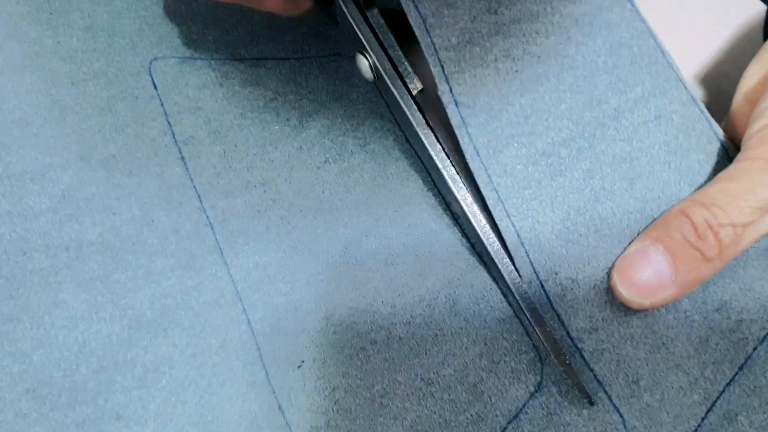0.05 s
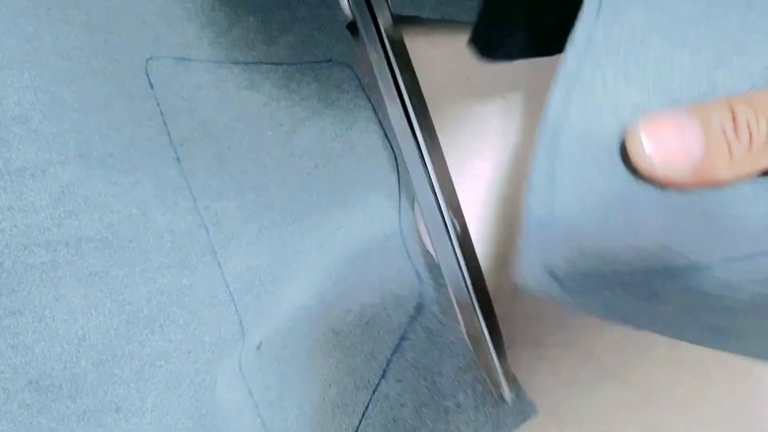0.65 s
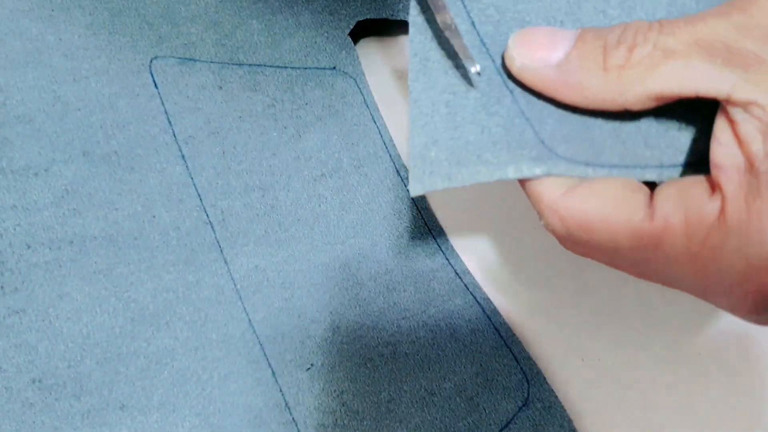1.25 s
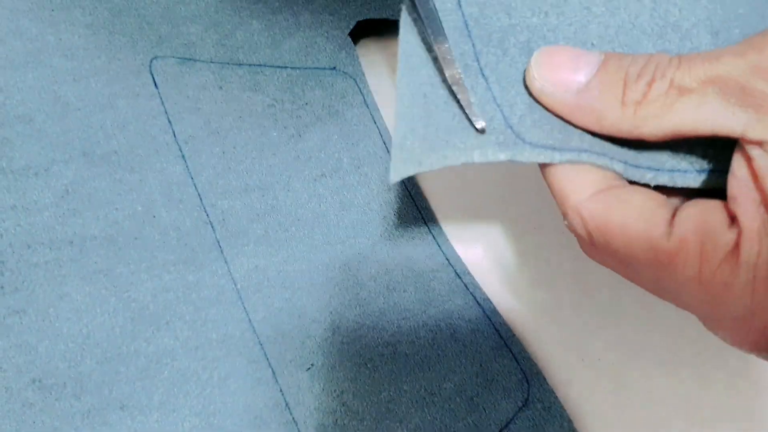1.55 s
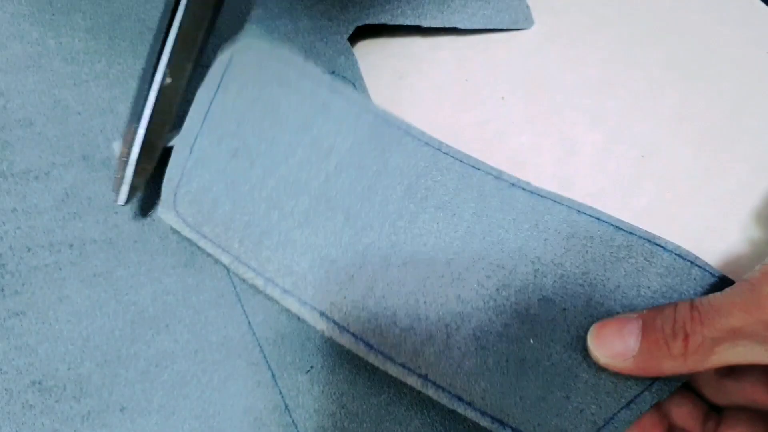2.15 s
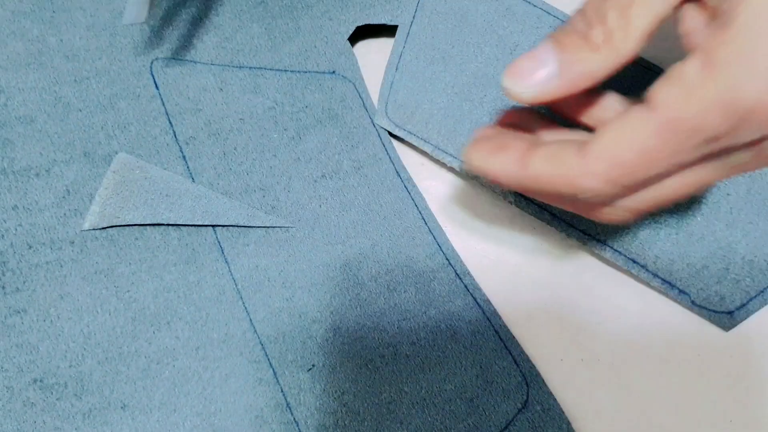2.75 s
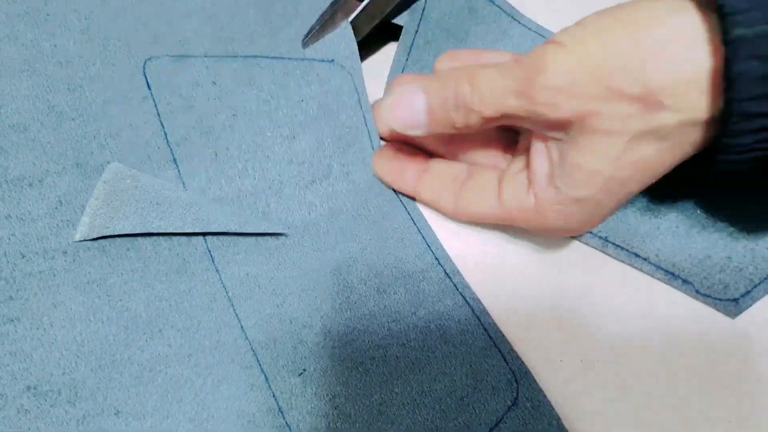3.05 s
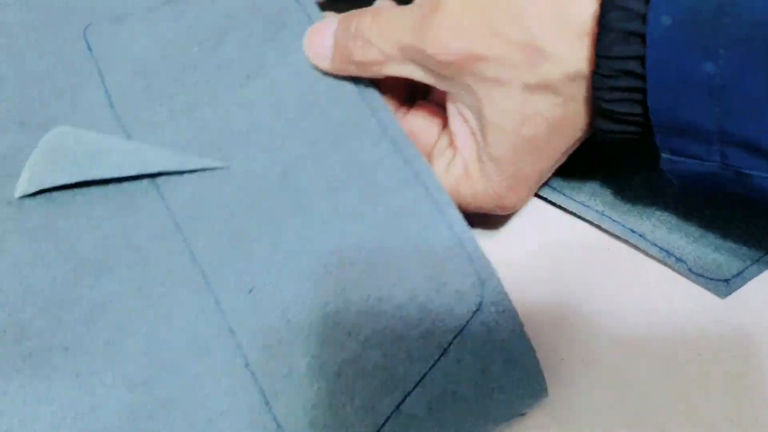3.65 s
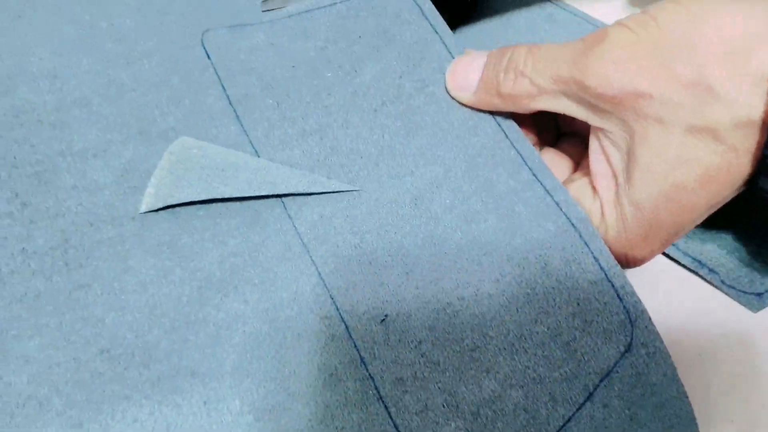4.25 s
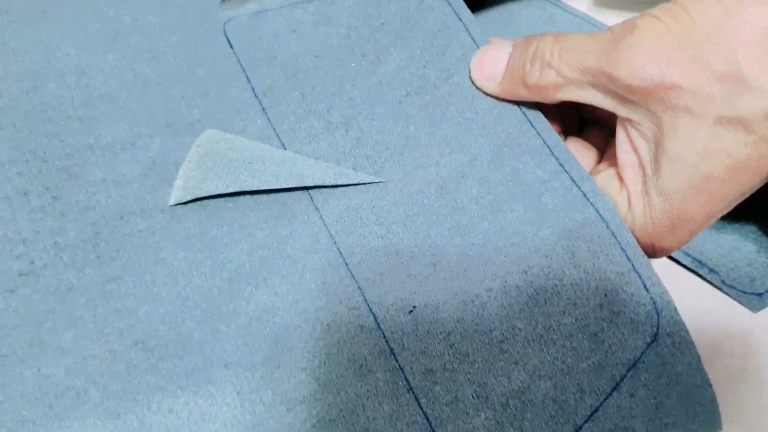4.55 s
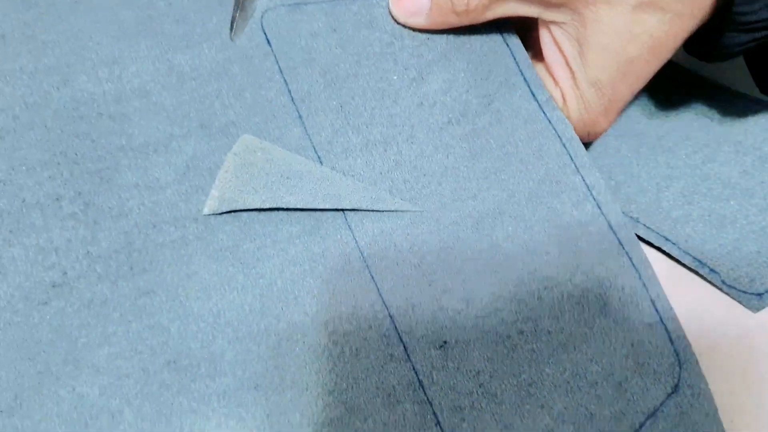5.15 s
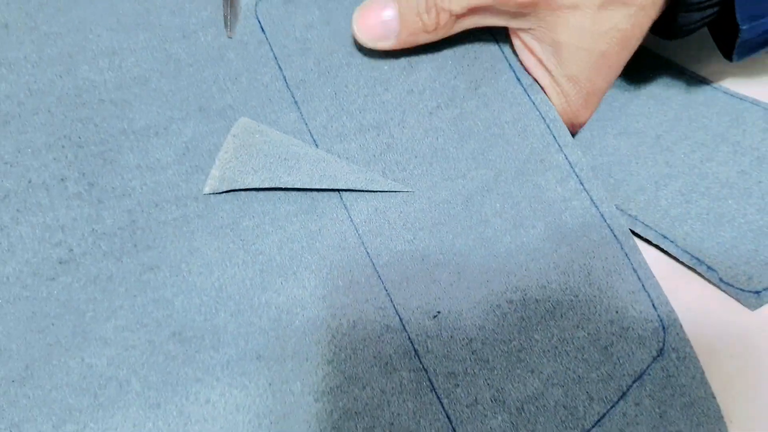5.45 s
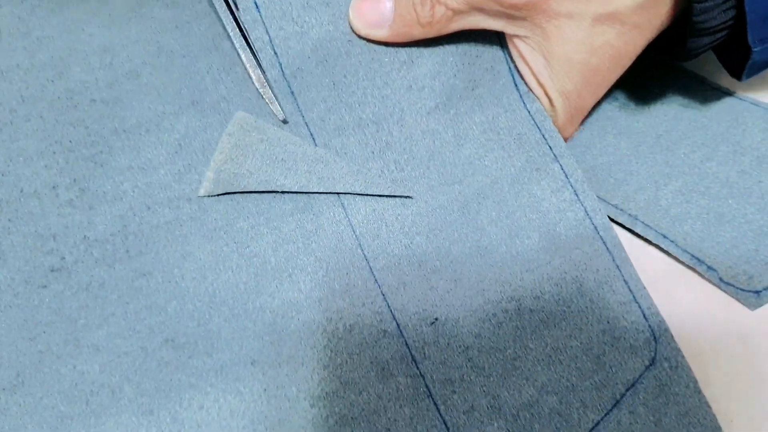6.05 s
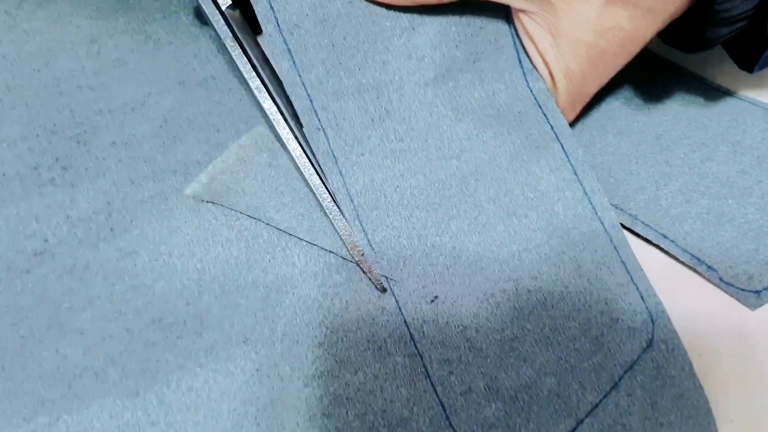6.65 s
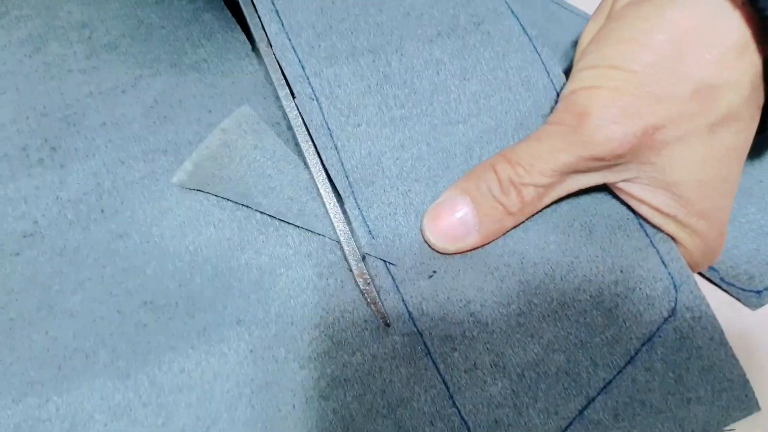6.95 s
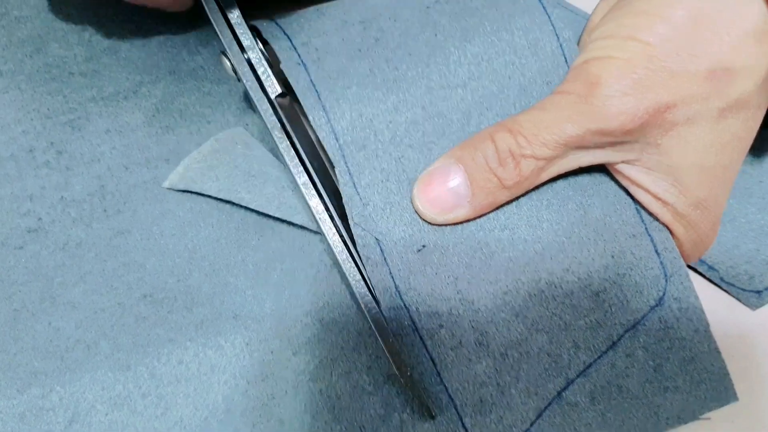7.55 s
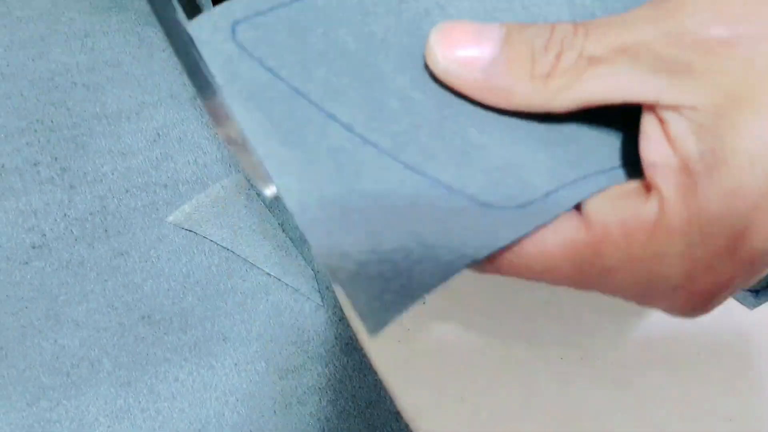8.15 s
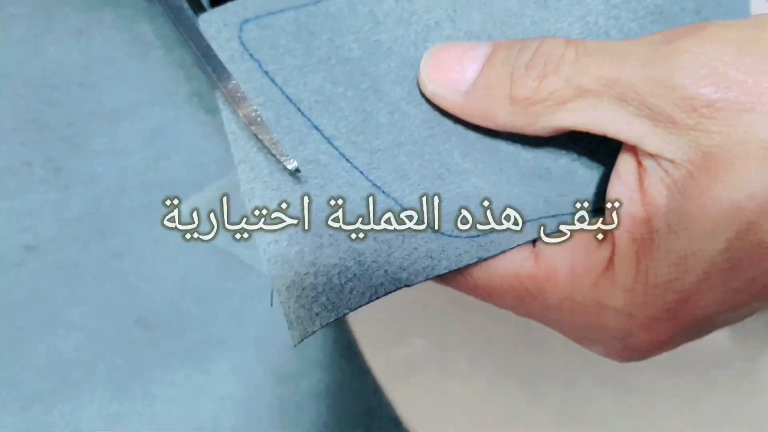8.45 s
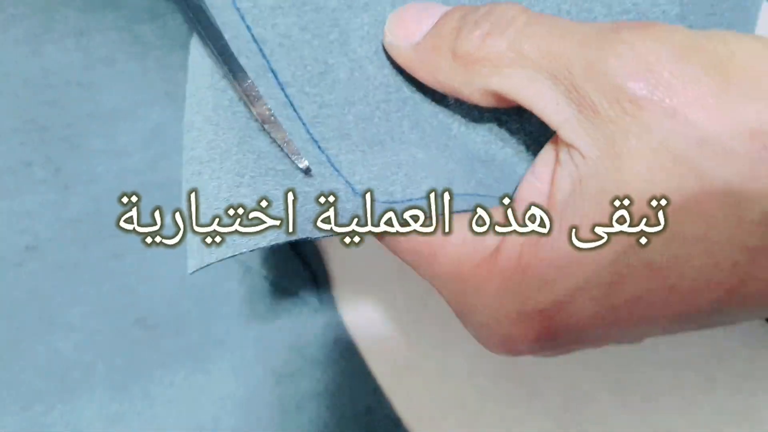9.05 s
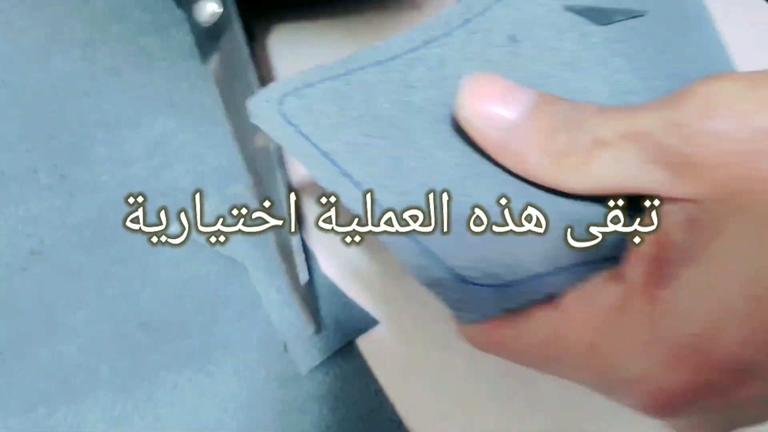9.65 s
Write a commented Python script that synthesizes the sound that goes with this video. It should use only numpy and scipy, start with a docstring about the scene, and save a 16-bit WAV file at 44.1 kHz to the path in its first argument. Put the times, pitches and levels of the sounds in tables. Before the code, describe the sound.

Heavy shears cut suede on a work table, close up in a dry room with a faint low hum. Four short, crunchy snips with a thin steel hiss fill the first 0.6 seconds, followed by two light metal taps. More small snips come from 1.3 to 2.2 seconds, ending with sharp ticks. From 2.5 to 3.9 seconds hands drag and turn the leather, with swishes, a tiny squeak, taps and soft table thuds. Quick, even cuts run from 4 to 4.9 seconds, about seven a second. Rubbing and a dull thud follow near 5.2. Cutting resumes from 5.4 to 8 seconds, growing crunchiest at the end, as a faint low drone comes up. Light ticks and a few trimming snips follow until 9.6, then a tap. At 9.9 seconds something is set down hard with a brief clatter, the loudest sound.

```python
"""Shears cutting suede

Heavy tailor's shears cut a shape out of suede on a work table, heard close up. Each closing stroke
crunches through fibres while the blades hiss and the sheet rings; between strokes the shears slide on.
Hands drag and turn the leather, the table thuds softly and a hum lies behind.
At the end something is set down hard on the table."""
import sys
import numpy as np
from scipy import signal
from scipy.fft import rfft, irfft, next_fast_len
from scipy.io import wavfile

SR = 44100
rng = np.random.default_rng(int(sys.argv[2]) if len(sys.argv) > 2 else 0)


def output_pcm(signal):
    """Save a mono or channel-first signal as 16-bit PCM at the path in sys.argv[1].

    Samples are clipped to [-1, 1] before scaling.
    """
    pcm = np.clip(np.atleast_2d(signal).T, -1, 1) * 32767
    wavfile.write(sys.argv[1], SR, np.round(pcm).astype(np.int16))


N = 437031
T = np.arange(N) / SR

# closing strokes: start_s, length_s, sheet_db, fibre_db, blade_db, ring_hz, first_snap_db, last_snap_db
STROKES = [(0.005, .03, -76.5, -72.5, -85, 536, 24.5, 25), (0.111, 0.047, -58.5, -56.5, -56.5, 800, 14, -2),
           (0.321, 0.061, -70.5, -59.5, -57, 1120, 6, -16),
           (0.522, 0.091, -68, -55.5, -57.5, 930, 14.5, 13), (1.32, 0.053, -62.5, -64.5, -61, 850, 7, 8),
           (1.587, 0.04, -68.5, -61, -56, 940, 12, 10), (1.803, 0.0076, -76, -61.5, -57.5, 810, 9.5, -8),
           (1.862, 0.015, -89, -62.5, -60, 820, 11, 4), (1.915, 0.011, -75.5, -65, -59.5, 940, -3, 9.5),
           (2.168, 0.031, -78, -66, -60, 967, -12, 11), (3.969, 0.035, -63.5, -62.5, -53.5, 960, 2, 4),
           (4.133, 0.031, -60.5, -64, -53, 883, 8.5, 6), (4.278, .022, -58, -65, -49, 964, 15.5, -0.5),
           (4.427, 0.029, -63, -65, -57, 990, 16, 14.5), (4.571, .024, -60.5, -60, -50.5, 897, 10.5, -23),
           (4.721, 0.0051, -48.5, -50, -46, 850, -12, -17), (4.87, 0.028, -65, -59, -54, 1190, -3, -14),
           (5.394, 0.018, -64.5, -65.5, -56, 820, 7.5, -17), (5.721, 0.036, -67, -69.5, -59, 800, 12, 10),
           (5.993, 0.023, -59, -56, -64, 1040, -21, -8), (6.074, 0.034, -57, -61.5, -55.5, 714, -12, -18),
           (6.227, 0.027, -55, -59.5, -53.5, 824, 2, -14), (6.379, .025, -56.5, -61, -55, 574, 11, -10),
           (6.531, 0.024, -56, -58, -52, 1053, 11, -11), (6.701, 0.023, -60, -63.5, -53.5, 784, 11, -10),
           (6.91, .03, -57.5, -60, -67, 830, -2, -18), (7.202, 0.061, -63.5, -64, -59.5, 1060, -20, 22),
           (7.462, 0.028, -54, -56, -53, 820, 7.5, 0), (7.635, 0.035, -57.5, -56, -51, 760, 12, 2),
           (7.798, 0.02, -55, -47, -48, 1120, 10, -2), (7.957, 0.024, -58.5, -47.5, -54.5, 946, 6.5, -0.5),
           (8.827, 0.1, -85, -70.5, -64.5, 700, -13, -3), (8.925, 0.04, -69.5, -65, -54, 670, -16, 2),
           (9.145, 0.027, -56.5, -59, -51.5, 940, -2, 2), (9.371, 0.054, -70, -69.5, -56, 940, 14, 8),
           (9.56, 0.018, -60.5, -58, -51.5, 985, 5, 0.5)]
# runs of strokes with one grip: start_s, whistle_over_hiss_db, opening_share_of_pause, rub_db, hiss_db
GRIPS = [(0, -0.5, 0.5, -67, -59.5), (1.2, -7, 0.69, -64.5, -67.5), (3.9, 6.5, 0.63, -54, -69),
         (5.3, -10, 0.58, -66, -66.5), (6.3, -2, 0.65, -56, -62.5), (6.8, -5, .52, -54.5, -59),
         (7.55, -1, 0.66, -56, -59.5), (8.5, -10, 0.73, -58.5, -68)]
# blade ring, damped by the leather: pitch_hz, width_hz, level_db
BLADE_MODES = [(6770, 75, -11.5), (7640, 870, -11.5), (8970, 310, -9.5), (11460, 370, 4.5),
               (12000, 500, -1)]
# spectra of the cut: freq_hz, level_db
SHEET_SPECTRUM = [(150, -30), (350, -7.5), (550, -2), (750, -0.5), (950, 1), (1250, -9), (2000, -5),
                  (5000, -53.5)]
FIBRE_SPECTRUM = [(600, -24.5), (1200, -3), (1600, -2), (2300, -0.5), (3200, -0.5), (4200, -1.5),
                  (5400, -7), (7500, -12.5), (15000, -33)]
BLADE_HISS_SPECTRUM = [(3500, -21), (5000, -5), (7000, -1.5), (8200, 4), (9700, 0.5), (11500, -7),
                       (15500, -16.5)]
EDGE_WHISTLE_SPECTRUM = [(7000, -19), (10000, 0.5), (11600, 2.5), (12800, 5.5), (14000, -6), (15500, -16)]


def cutting(lead_s=0.0053, ring_share=0.23, steel_share=0.063, push_db=-10):
    """Fibres part; the held sheet rings, the edges hiss and the lower blade pushes on the table."""
    force = stroke_forces(lead_s)
    push = from_db(push_db) * resonate((force[0] + force[1]) * noise(), hz=175, width_hz=59)
    force *= grains(per_s=1000, spread_db=2.5)
    force += snap_forces()
    sheet, fibre, blade = (part_force * noise() for part_force in force)
    ring, whistle_share = np.zeros((2, N)), np.zeros(N)
    starts = [max(round((start_s - lead_s) * SR), 0) for start_s, *_ in STROKES]
    for (start_s, *_, ring_hz, _, _), start, end in zip(STROKES, starts, starts[1:] + [N]):
        whistle_db, *_ = grip_at(start_s)
        whistle_share[start:] = 1 / (1 + from_db(-whistle_db) ** 2)
        # the free length of leather, and so pitch and colour, differ by stroke
        span = slice(start, min(end, start + SR // 4))
        ring[:, span] = resonate(sheet[:, span], ring_hz, width_hz=70)
        for layer in (fibre, blade):
            layer[:, span] = patchy(layer[:, span], depth_db=1.5)
    leather = np.sqrt(1 - ring_share) * colour(sheet, SHEET_SPECTRUM) + np.sqrt(ring_share) * ring
    crunch = colour(fibre, FIBRE_SPECTRUM)
    hiss = colour(blade * np.sqrt(1 - whistle_share), BLADE_HISS_SPECTRUM)
    whistle = from_db(0.5) * colour(blade * np.sqrt(whistle_share), EDGE_WHISTLE_SPECTRUM)
    steel = sum(from_db(db) * resonate(blade, hz, width_hz) for hz, width_hz, db in BLADE_MODES)
    steel *= np.sqrt(steel_share / len(BLADE_MODES))
    edges = hiss + whistle
    return from_db(-1.1) * leather + from_db(-2.3) * crunch + from_db(-1.5) * edges + steel + push


def stroke_forces(lead_s, brush_db=-11, half_rise_s=0.0036, release_s=0.0086, sag_db=5.0):
    """Blades brush the nap, bite and lose leverage towards the tips: force on sheet, fibres, blades."""
    force, early_s = np.zeros((3, N)), 0.05
    t = np.arange(SR // 4) / SR - early_s
    brush = from_db(brush_db) * np.exp(np.minimum(t, 0) / lead_s)
    bite = np.clip((t + half_rise_s) / (2 * half_rise_s), 0, 1) ** 2
    for start_s, length_s, *levels_db, _, _, _ in STROKES:
        release = np.exp(-np.maximum(t - length_s, 0) / release_s)
        leverage = from_db(sag_db * (0.5 - np.clip(t / length_s, 0, 1)))
        stroke = np.maximum(brush, bite) * release * leverage
        add(force, start_s - early_s, from_db(levels_db)[:, None] * stroke)
    return force


def grip_at(time_s):
    """The grip in use: its row without start_s."""
    return [grip[1:] for grip in GRIPS if grip[0] <= time_s][-1]


FIRST_SNAP_S, LAST_SNAP_SHARE = 0.0073, 0.794


def snap_forces(rise_s=0.002, first_parts_db=(-2.5, -5, -20), last_parts_db=(-1, -0.5, -3)):
    """Tough bundles give way early and late in each stroke: force on sheet, fibres, blades."""
    force, t = np.zeros((3, N)), np.arange(SR // 20) / SR
    burst = t / rise_s * np.exp(1 - t / rise_s)
    for start_s, length_s, *levels_db, _, first_db, last_db in STROKES:
        first = (FIRST_SNAP_S, first_db, first_parts_db)
        last = (LAST_SNAP_SHARE * length_s, last_db, last_parts_db)
        for after_s, snap_db, parts_db in (first, last):
            strength = from_db(np.add(levels_db, parts_db) + snap_db)
            add(force, start_s + after_s - rise_s, strength[:, None] * burst)
    return force


def snap_rings(knock_db=-1, sag_per_s=0.86, ping_db=-12):
    """Each snap plucks the sheet, whose pitch sags as it slackens, and pings the steel."""
    out, t = np.zeros((2, N)), np.arange(SR // 10) / SR
    for start_s, length_s, sheet_db, _, blade_db, ring_hz, first_db, last_db in STROKES:
        knock = mode(t, ring_hz * (1 - sag_per_s * t), t60_s=0.039)
        for after_s, snap_db in ((FIRST_SNAP_S, first_db), (LAST_SNAP_SHARE * length_s, last_db)):
            add(out[0], start_s + after_s, from_db(sheet_db + snap_db + knock_db) * knock)
            # each ping rings at slightly different, random pitches
            ping = sum(from_db(db) * mode(t, hz + width_hz * (rng.random((2, 1)) - 0.5), t60_s=0.04)
                       for hz, width_hz, db in BLADE_MODES)
            add(out, start_s + after_s, from_db(blade_db + ping_db) * ping)
    return out


# suede sweeping over sheet or blade, and the rough edge of the squeak near 4.9 s: start_s, length_s, level_db,
# centre_hz, width_hz
SWISHES = [(1.494, 0.021, -63, 4250, 500), (1.73, 0.011, -60, 2260, 600), (1.88, 0.1, -72, 4400, 500),
           (1.981, 0.057, -56.5, 3050, 1200), (2.541, 0.026, -62.5, 1450, 500),
           (2.619, 0.019, -46, 1720, 400), (2.623, 0.023, -52, 2780, 3650), (2.625, .025, -57, 720, 87),
           (3.013, 0.036, -55, 9500, 5000), (3.766, 0.052, -62, 1160, 350), (4.859, .04, -59.5, 1130, 130),
           (4.966, 0.079, -61, 730, 160), (5.17, 0.022, -47, 7200, 910), (5.163, 0.032, -51, 9900, 4000),
           (7.164, 0.082, -68, 1080, 400)]
# opening blades rasping on each other: centre_hz, width_hz, level_db
RASP_MODES = [(2230, 1300, -17), (4180, 710, -14)]
# spectra of sliding suede: freq_hz, level_db
RUB_SPECTRUM = [(100, 0.5), (200, 5.5), (400, 3), (700, 2.5), (1200, -1), (1700, 0.5), (2800, -5.5),
                (4500, -14.5), (9000, -34.5)]
NAP_HISS_SPECTRUM = [(1500, -10.5), (3000, 1.5), (4200, 1.5), (7500, -1), (10000, -2), (13000, -3),
                     (15500, -19)]


def rubbing(slide_rub_db=-6, slide_boom_db=-10.5, drag_boom_db=-5):
    """Suede slides over table and opening blades with a grainy rub; skids make the table boom."""
    drag, drag_hiss = handling()
    slide, slide_hiss = openings()
    nap = grains(per_s=350, spread_db=4.0)
    rub = colour((drag + from_db(slide_rub_db) * slide) * nap * noise(), RUB_SPECTRUM)
    fine_nap = grains(per_s=1900, spread_db=2.5)
    hiss = colour((drag_hiss + slide_hiss) * fine_nap * noise(), NAP_HISS_SPECTRUM)
    rasp = sum(from_db(db) * resonate(slide * nap * noise(), hz, width_hz)
               for hz, width_hz, db in RASP_MODES)
    skid = from_db(slide_boom_db) * slide + from_db(drag_boom_db) * drag
    boom = resonate(skid * noise(), hz=160, width_hz=60)
    swishes = np.zeros((2, N))
    for start_s, length_s, db, hz, width_hz in SWISHES:
        speed = gesture(start_s, length_s, attack_s=0.014, release_s=0.025)
        swishes += resonate(from_db(db) * speed * noise(), hz, width_hz)
    return rub + hiss + rasp + boom + swishes


def openings(min_pause_s=0.08, max_pause_s=0.255):
    """The shears open and slide on in short pauses between strokes: rub and hiss envelopes."""
    envelopes = np.zeros((2, N))
    for (start_s, length_s, *_), (next_s, *_) in zip(STROKES, STROKES[1:]):
        pause_s = next_s - start_s - length_s
        if min_pause_s < pause_s < max_pause_s:
            _, share, *levels_db = grip_at(next_s)
            speed = swell(start_s + length_s + share * pause_s, half_width_s=0.016)
            envelopes += from_db(levels_db)[:, None] * speed
    return envelopes


# long moves of the suede, one curve each: time_s, rub_db, hiss_db
DRAGS = [
    [(1.88, -84, -68), (1.914, -67, -64), (1.924, -86, -67), (1.936, -69.5, -63.5), (2.024, -62.5, -61.5),
     (2.038, -72, -69), (2.056, -67, -70), (2.1, -95, -88), (2.15, -70, -68.5)],
    [(2.22, -73, -72), (2.254, -83, -82), (2.316, -73, -71.5), (2.402, -84.5, -89), (2.558, -71.5, -62.5),
     (2.61, -69, -78), (2.636, -62.5, -59.5), (2.736, -64.5, -71.5), (2.8, -121, -85)],
    [(2.88, -97, -90), (2.894, -72, -83), (2.948, -69.5, -63.5), (3.016, -60.5, -57), (3.27, -66, -72.5),
     (3.342, -62, -65.5), (3.418, -71.5, -77.5), (3.818, -65, -71), (3.92, -77.5, -91)],
]
# brief hand shifts: start_s, length_s, rub_db, hiss_db
HAND_SHIFTS = [(0.638, 0.28, -67, -68.5), (0.76, 0.01, -60, -70), (1.129, 0.042, -78, -87),
               (1.282, .025, -73, -69), (1.364, 0.094, -72.5, -72), (1.682, 0.019, -77, -70.5),
               (3.301, 0.066, -70, -66), (3.585, 0.035, -62, -67), (4.943, 0.093, -59, -65),
               (5.194, 0.08, -61, -59.5), (5.44, 0.07, -72.5, -70.5), (5.543, 0.047, -62.5, -63),
               (5.811, 0.032, -64.5, -62), (6.64, 0.037, -57, -62), (6.872, 0.03, -57, -72),
               (6.95, 0.051, -76, -80.5), (7.05, 0.011, -64, -88), (7.144, 0.032, -86, -72.5),
               (7.986, 0.12, -66.5, -68.5), (8.13, 0.016, -59.5, -63.5), (8.994, 0.053, -71.5, -75),
               (9.211, 0.049, -67.5, -75), (9.607, 0.02, -58, -68), (9.658, 0.29, -64.5, -68.5)]


def handling(rub_gain_db=2, hiss_gain_db=2.5):
    """Hands drag and shift the suede, catching now and then: rub and hiss envelopes."""
    rub = from_db(rub_gain_db) * sum(level(move, column=1) for move in DRAGS)
    hiss = from_db(hiss_gain_db) * sum(level(move, column=2) for move in DRAGS)
    envelopes = np.array([rub, hiss])
    for start_s, length_s, *levels_db in HAND_SHIFTS:
        speed = gesture(start_s, length_s, attack_s=0.021, release_s=0.03)
        envelopes += from_db(levels_db)[:, None] * speed
    return envelopes * grains(per_s=60, spread_db=2.0)


# light taps of the shears: start_s, level_db, ring_hz, brightness_db
TAPS = [(0.766, -31.5, 2030, -2.5), (0.891, -40, 2230, 5), (1.308, -46.5, 2970, 17),
        (1.961, -34.5, 1750, -11), (2.187, -28, 6650, 0), (2.562, -37, 1520, -14), (2.895, -47, 1600, -10),
        (2.981, -31, 1630, -12), (3.334, -31, 870, -19), (8.055, -46.5, 2210, 10.5), (8.315, -56, 7000, -2),
        (8.505, -59, 7000, 3), (8.675, -49.5, 2160, 7), (9.622, -27, 590, -12)]


def taps(crack_t60_s=0.0062, rattle_db=-17, rattle_t60_s=0.043):
    """Steel touches steel or table: a crack, a very short ring and a faint rattle."""
    out, t = np.zeros((2, N)), np.arange(SR // 10) / SR
    for start_s, db, hz, brightness_db in TAPS:
        crack, rattle = rng.standard_normal((2, 2, len(t)))
        tap = from_db(brightness_db - 8.5 - 60 * t / crack_t60_s) * crack
        tap += from_db(rattle_db - 60 * t / rattle_t60_s) * resonate(rattle, hz, width_hz=0.76 * hz)
        tap[0] += from_db(-5) * mode(t, hz, t60_s=0.0061)
        add(out, start_s, from_db(db) * tap)
    return out


# soft blows of hand and shears: start_s, level_db, pitch_hz, rise_s
THUDS = [(2.005, -49.5, 210, 0.0045), (2.05, -45, 153, 0.0039), (2.075, -50, 114, .005),
         (2.983, -36, 151, 0.0038), (3.06, -45.5, 164, .004), (3.19, -45, 188, 0.023),
         (3.461, -41.5, 143, 0.0017), (3.506, -43.5, 152, 0.0038), (3.618, -46, 161, 0.0021),
         (5.22, -34.5, 208, 0.019), (5.894, -52, 195, .004), (6.33, -49.5, 178, .004),
         (6.739, -42.5, 136, 0.001), (7.252, -47, 144, 0.0026), (7.648, -37, 139, .004),
         (7.819, -49, 200, 0.0033)]
# hard blows: start_s, crack_db, crack_hz, boom_db
KNOCKS = [(9.866, -16.5, 1890, -19), (9.8848, -17, 2100, -37), (9.9031, -8, 1470, -15)]
# table and things on it: pitch_hz, level_db, t60_s
TABLE_MODES = [(159, -1, 0.12), (268, -10, 0.095), (295, -23, 0.11), (786, -13, 0.021), (1535, -13, 0.043),
               (2910, -20, .08)]
# things rattling: freq_hz, level_db
RATTLE_SPECTRUM = [(100, -2), (400, 2.5), (900, -8), (1600, 4), (2500, -7), (3200, -3), (5000, -9),
                   (9000, -12), (12000, -10.5), (15500, -16)]


def table_blows(crack_t60_s=0.0073, rattle_db=-31, rattle_t60_s=0.53):
    """Soft blows wake only the table's boom; hard ones crack, wake all modes and set things rattling."""
    out, shake_power, t = np.zeros((2, N)), np.zeros(N), np.arange(SR // 3) / SR
    for start_s, db, hz, rise_s in THUDS:
        boom = mode(t, hz, t60_s=0.06 + 6.8 * rise_s)  # a slower blow rings longer
        add(out[0], start_s, from_db(db) * np.minimum(t / rise_s, 1) * boom)
    body = sum(from_db(db) * mode(t, hz, t60_s) for hz, db, t60_s in TABLE_MODES)
    for start_s, crack_db, hz, boom_db in KNOCKS:
        add(out[0], start_s, from_db(boom_db) * body - from_db(crack_db) * mode(t, hz, crack_t60_s))
        jolt = from_db(crack_db - 11 - 60 * t / crack_t60_s)
        settling = from_db(rattle_db - 60 * t / rattle_t60_s)
        add(shake_power, start_s, (jolt + settling) ** 2)
    rattle = np.sqrt(shake_power) * grains(per_s=500, spread_db=4.5) * noise()
    return out + colour(rattle, RATTLE_SPECTRUM)


# stick-slip squeaks: middle_s, half_width_s, pitch_hz, level_db
SQUEAKS = [(2.609, 0.016, 1124, -49), (4.89, 0.027, 1157, -59.5)]


def squeaks(waver_share=0.034, glide_per_s=0.31):
    """Something sticks and slips in a short, nearly pure tone that rises a little."""
    out = np.zeros((2, N))
    for middle_s, half_width_s, hz, db in SQUEAKS:
        waver = waver_share * resonate(rng.standard_normal(N), hz=60, width_hz=120)
        pitch_hz = hz * (1 + glide_per_s * (T - middle_s) + waver)
        tone = np.sqrt(2) * np.sin(2 * np.pi * np.cumsum(pitch_hz) / SR)
        out[0] += from_db(db) * swell(middle_s, half_width_s) * tone
    return out


# room rumble and late drone: time_s, level_db
RUMBLE_LEVELS = [(0, -64.5), (0.85, -78), (1.1, -79.5), (2.4, -77), (3.2, -68.5), (4.0, -71), (5.7, -71.5),
                 (6.7, -68.5), (7.3, -76), (7.8, -70), (9.8, -78.5)]
DRONE_LEVELS = [(0, -105), (7.3, -74.5), (7.8, -61.5), (8.6, -62), (9.9, -62)]
# their spectra: freq_hz, level_db
RUMBLE_SPECTRUM = [(20, -29), (42, -18.5), (64, -4.5), (80, -8), (100, 4.5), (135, 0), (200, -8),
                   (280, -20), (450, -17.5), (750, -21.5), (1300, -24), (3000, -30.5), (15000, -36.5)]
DRONE_SPECTRUM = [(60, -24), (100, 1.5), (140, -11.5), (190, 4), (235, -8), (290, -12), (370, -12.5),
                  (480, -29), (1200, -38), (1500, -22), (2200, -27), (2700, -46), (12000, -78)]
# faint steady background tones: pitch_hz, width_hz, level_db
FAINT_TONES = [(196.8, 8.9, -79.5), (358, 15, -84), (703.6, 15, -88)]


def background(hum_hz=100, hum_db=-76, rumble_gain_db=3.0):
    """Mains hum, room rumble, a few faint tones and a dull drone that comes up late."""
    hum = from_db(hum_db) * np.sqrt(2) * np.sin(2 * np.pi * hum_hz * T) * [[1], [0]]  # direct only
    rumble_db = np.interp(T, *np.transpose(RUMBLE_LEVELS)) + rumble_gain_db
    rumble = from_db(rumble_db) * colour(noise(), RUMBLE_SPECTRUM)
    tones = sum(from_db(db) * resonate(noise(), hz, width_hz) for hz, width_hz, db in FAINT_TONES)
    drone = level(DRONE_LEVELS) * colour(noise(), DRONE_SPECTRUM)
    return hum + rumble + tones + drone


# likeness of left and right: freq_hz, coherence
PORT_COHERENCE = [(30, 0.29), (100, 0.93), (500, 0.94), (1200, 0.85), (2500, 0.89), (4000, 0.24),
                  (8000, 0.1), (15000, 0.1)]
# stereo balance: freq_hz, left_minus_right_db
PORT_BALANCE = [(100, -1.2), (500, -1), (1200, 0.5), (3000, 0), (8000, 0.9), (14000, 2)]


def microphone_ports(x, lag_s=0.000068):
    """Direct and scattered sound reach two ports; the left one is a little nearer."""
    size = next_fast_len(N + SR // 10)
    hz = np.fft.rfftfreq(size, 1 / SR)
    coherence = at_hz(PORT_COHERENCE, hz)
    direct, scattered = rfft(x, size) * np.sqrt([(1 + coherence) / 2, (1 - coherence) / 2])
    left_db = at_hz(PORT_BALANCE, hz) / 2
    left = (direct + scattered) * from_db(left_db)
    right = (direct - scattered) * from_db(-left_db) * np.exp(-2j * np.pi * hz * lag_s)
    return irfft(np.array([left, right]), size)[:, :N]


def room(x, t60_s=0.14, tail_db=-10, gap_s=0.003, band_hz=(350, 11000)):
    """Reflections add a short, weak tail with little bass, different at each port."""
    t = np.arange(SR // 3) / SR
    tail = rng.standard_normal((2, len(t))) * from_db(-60 * t / t60_s) * (t > gap_s)
    tail /= np.linalg.norm(tail, axis=1, keepdims=True)
    tail = signal.sosfilt(signal.butter(1, band_hz, "band", fs=SR, output="sos"), tail)
    return x + from_db(tail_db) * signal.oaconvolve(x, tail, axes=-1)[:, :N]


def noise():
    """Two unrelated noises: direct, and scattered by hands and table."""
    return rng.standard_normal((2, N))


def grains(per_s, spread_db):
    """Catching and letting go: a force that jumps to random strengths at random times; rms 1."""
    catch = np.cumsum(rng.random(N) < per_s / SR)
    force = from_db(spread_db * np.clip(rng.standard_normal(N), -2, 2))[catch]
    return force / np.sqrt(np.mean(force ** 2))


def patchy(x, depth_db, bands=48):
    """Random band gains make different parts of the spectrum stand out."""
    hz = np.fft.rfftfreq(x.shape[-1], 1 / SR)
    bands_db = depth_db * np.clip(rng.standard_normal(bands), -2, 2)
    gain = from_db(np.interp(np.sqrt(hz), np.linspace(0, np.sqrt(SR / 2), bands), bands_db))
    return irfft(rfft(x) * gain / np.sqrt(np.mean(gain ** 2)), x.shape[-1])


def colour(x, spectrum, size=4096):
    """Minimum-phase filter that keeps the power of white noise."""
    cepstrum = irfft(np.log(from_db(at_hz(spectrum, np.fft.rfftfreq(size, 1 / SR)))))
    causal = 2 * cepstrum * (np.arange(size) < size // 2)
    response = irfft(np.exp(rfft(causal)))
    return signal.oaconvolve(x, response[None] / np.linalg.norm(response), axes=-1)[:, :N]


def resonate(x, hz, width_hz):
    """Resonance that keeps the power of white noise."""
    radius = np.exp(-np.pi * width_hz / SR)
    gain = np.sqrt((1 - radius ** 2) / 2)
    feedback = [1, -2 * radius * np.cos(2 * np.pi * hz / SR), radius ** 2]
    return signal.lfilter([gain, 0, -gain], feedback, x + 1e-18)


def mode(t, hz, t60_s):
    """Decaying sine."""
    return np.sin(2 * np.pi * hz * t) * from_db(-60 * t / t60_s)


def swell(middle_s, half_width_s):
    """Gaussian rise and fall."""
    return np.exp(-np.minimum(((T - middle_s) / half_width_s) ** 2 / 2, 20))


def gesture(start_s, length_s, attack_s, release_s):
    """Speed of a short move: rise, hold, decay."""
    rise = np.clip((T - start_s) / attack_s, 0, 1)
    return rise * np.exp(-np.clip((T - start_s - length_s) / release_s, 0, 20))


def level(rows, column=1, fade_s=0.047):
    """Gain in time from a dB column, fading outside its rows."""
    times_s, levels_db = np.transpose(rows)[[0, column]]
    outside_s = np.maximum(times_s[0] - T, 0) + np.maximum(T - times_s[-1], 0)
    return from_db(np.interp(T, times_s, levels_db)) * np.maximum(1 - outside_s / fade_s, 0)


def at_hz(points, hz):
    """Interpolate on a log-frequency axis."""
    points_hz, values = np.transpose(points)
    return np.interp(np.log(np.maximum(hz, 1)), np.log(points_hz), values)


def from_db(db):
    """Decibels to gain."""
    return 10 ** (np.asarray(db) / 20)


def add(track, start_s, sound):
    """Mix a sound into a track."""
    start = max(round(start_s * SR), 0)
    track[..., start:start + sound.shape[-1]] += sound[..., :max(N - start, 0)]


def scene(radiation_hz=115):
    """Work at the table over the background, in a room."""
    near = cutting() + snap_rings() + rubbing() + taps() + table_blows() + squeaks()
    # things this small radiate little deep bass
    near = signal.sosfilt(signal.butter(3, radiation_hz, "high", fs=SR, output="sos"), near)
    return room(microphone_ports(near + background()))


def record(dry):
    """Steep low-pass."""
    cutoff_hz = 15700
    return signal.sosfilt(signal.ellip(10, 0.2, 70, cutoff_hz, fs=SR, output="sos"), dry)


dry = scene()
out = record(dry)
output_pcm(out)
```